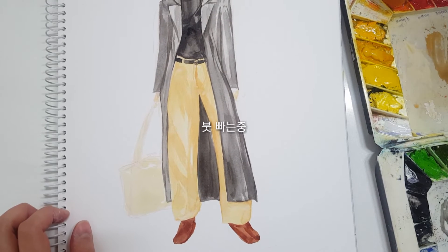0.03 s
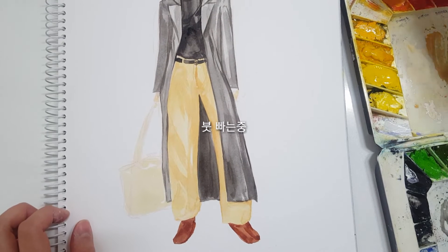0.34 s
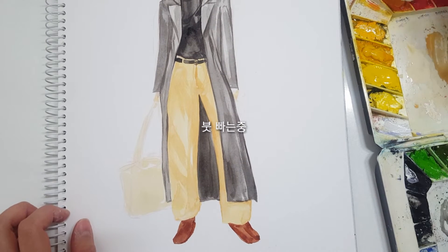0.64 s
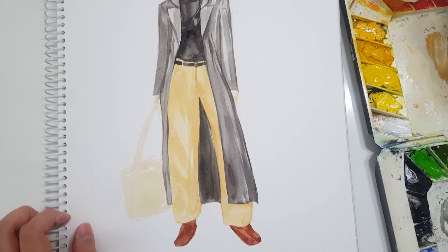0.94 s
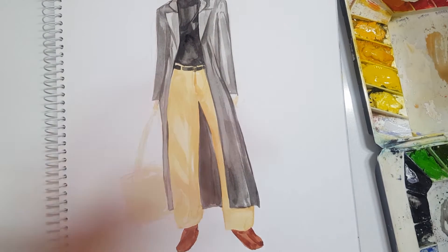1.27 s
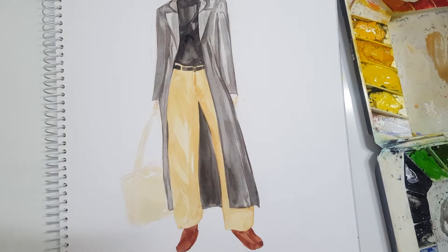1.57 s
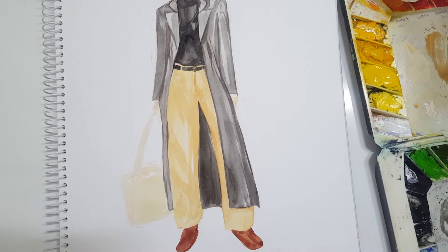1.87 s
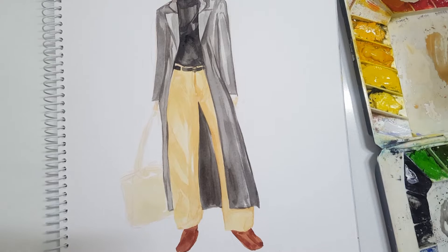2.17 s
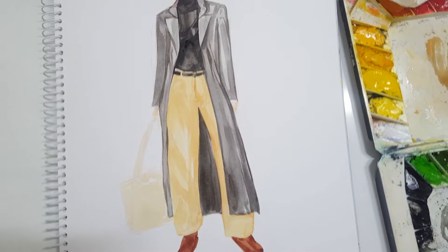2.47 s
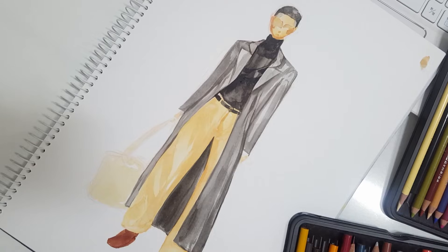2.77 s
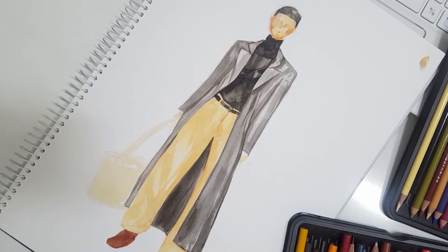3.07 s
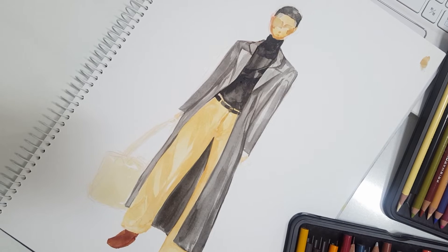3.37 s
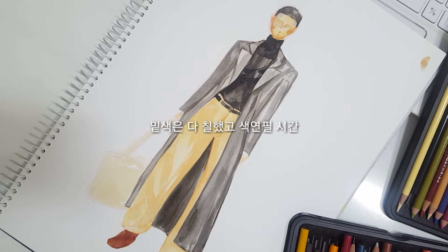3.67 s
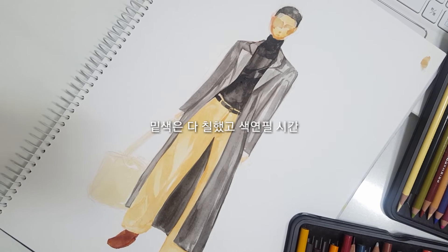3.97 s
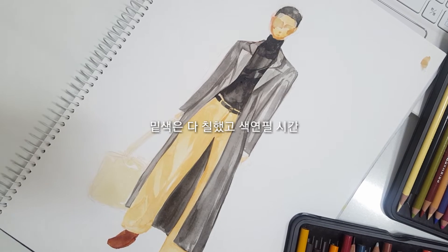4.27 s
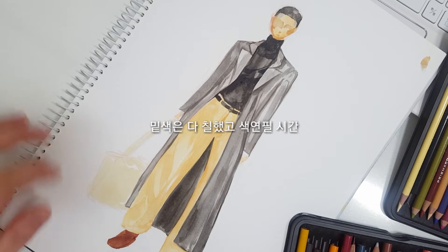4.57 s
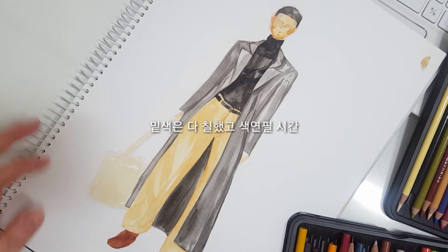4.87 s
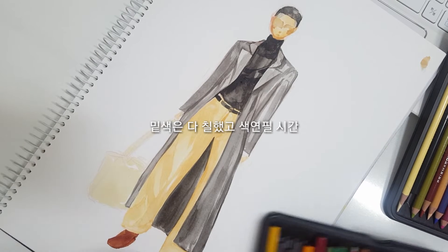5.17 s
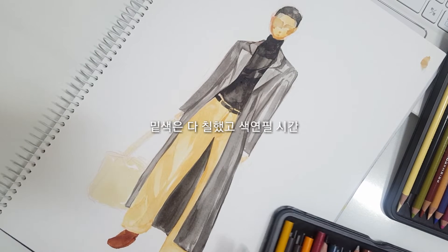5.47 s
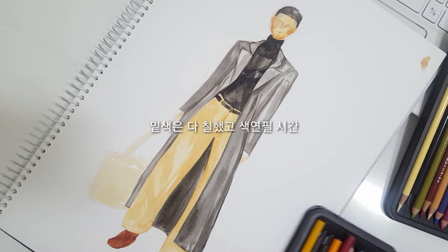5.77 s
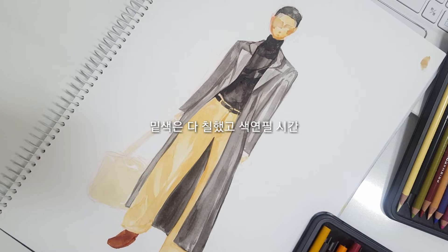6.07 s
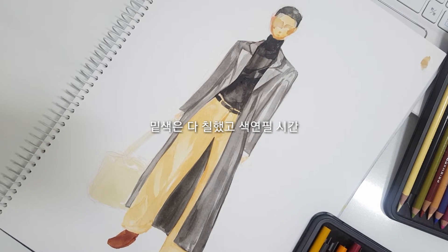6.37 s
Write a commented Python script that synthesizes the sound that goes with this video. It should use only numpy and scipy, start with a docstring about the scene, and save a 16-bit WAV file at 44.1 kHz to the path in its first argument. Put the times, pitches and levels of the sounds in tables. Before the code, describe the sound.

A hand bumps a desk and a brush clinks in a jar, then a tin of pencils scrapes and rattles across the desk.

```python
"""Painting things are handled on a desk in a small quiet room. First a hand brushes a sketchbook
(sliding friction) and bumps it (impacts that set the desk booming). Near 2 s a rinsed brush clinks
against its water jar, whose modes ring freely. A low wavering drone swells at 3.5 s. From 4.9 s a tin
of coloured pencils is pushed round in short shoves: stick-slip friction makes it grind, and jolts
make the pencils rattle. Just after 6 s it settles with two thuds."""
import sys
import numpy as np
from scipy import signal
from scipy.fft import rfft, irfft
from scipy.io import wavfile
from scipy.ndimage import uniform_filter1d

SR = 44100
rng = np.random.default_rng(int(sys.argv[2]) if len(sys.argv) > 2 else 0)


def wrap_up_sound(samples):
    """Save the sound to the file named by the first command line argument, as 16-bit audio."""
    columns = np.atleast_2d(samples).T
    # keep every value between -1 and 1, then stretch to whole-number steps
    tamed = np.clip(columns, -1, 1)
    steps = np.round(tamed * 32767).astype(np.int16)
    wavfile.write(sys.argv[1], SR, steps)


N = 282681
SIZE = 16384  # samples in one impulse response
HZ = np.maximum(np.arange(SIZE // 2 + 1) * SR / SIZE, 1)  # its frequency grid
AGE = np.arange(SIZE) / SR  # its time axis in seconds
DIRECT_WIDTH_DB = -3  # direct sound is narrower than the diffuse field

# Tabulated levels are relative: each source applies its own gain.
# jolts of the pencils in the tin: t/s, clack level/dB, sharpness/dB, desk knock level/dB, hollow f/Hz
JOLTS = [(4.926, -27, 0, -49.5, 1330), (5.086, -29.5, -1.5, -61, 1250), (5.156, -27.5, -15, -48, 1070),
         (5.164, -22, -1.5, -46, 1140), (5.179, -11.5, -1, -42, 1080), (5.202, -18, -3.5, -48, 1150),
         (5.248, -9, -5, -53, 934), (5.266, -21.5, -26, -72, 865), (5.353, -20.5, -6, -43, 875),
         (5.446, -21.5, 5, -37, 990), (5.479, -13, -0.5, -49, 1010), (5.489, -23, 14.5, -49, 1040),
         (5.499, -18, 5, -38.5, 1080), (5.549, -19, -13, -38, 1010), (5.592, -19.5, -7, -44, 1180),
         (5.603, -22, -8, -46, 1020), (5.646, -20, -7, -38.5, 1167), (5.695, -15.5, -17.5, -36.5, 800),
         (5.726, -15.5, 1, -39, 1100), (5.808, -13.5, 2.5, -28, 1090), (5.814, -22, 2.5, -32, 1020),
         (5.893, -21.5, -11, -43, 1260), (5.927, -30, -3, -51, 1220), (5.935, -24.5, -8, -47, 1280),
         (5.971, -18.5, -2.5, -43.5, 1260)]
# resonances of the tin's panels: f/Hz, bandwidth/Hz, lift/dB
TIN_MODES = [(213, 22, 8), (280, 16, 9), (425, 16, 5), (510, 10, 9), (645, 16, 4), (742, 20, 5),
             (932, 20, 8), (1030, 24, 10), (1130, 24, 8), (1260, 30, 3), (1435, 26, 6), (1558, 26, 5),
             (1724, 26, 6), (1959, 20, 7), (2046, 20, 7), (2223, 14, 9), (2445, 26, 7), (3201, 14, 8),
             (3285, 18, 8), (3580, 50, 3)]
# spectral envelopes of the tin's clack and of the snap and click at the contact: f/Hz, level/dB
CLACK_SPECTRUM = [(100, -45), (350, -9), (600, -7), (1000, -5.5), (1500, -2.5), (2200, -6), (3500, -29),
                  (5000, -27), (9000, -56)]
SNAP_SPECTRUM = [(1000, -27), (2000, 2.5), (2600, -1), (3800, -1.5), (4600, -8.5), (6000, -8.5),
                 (12000, -38)]
CLICK_SPECTRUM = [(2000, -7), (4500, 4), (5500, 7.5), (8000, 6), (10500, 6), (11900, 3), (13000, 0),
                  (15500, -8)]


def tin_rattle(clack_db, snap_db, click_db, knock_db, clank_db, rise_s):
    """Impact excitation: each jolt sounds tin and desk; a sharper contact radiates more treble."""
    out = np.zeros((2, N))
    board = spectrum(DESK_SPECTRUM, DESK_MODES)
    for s, db, sharpness, desk_db, hollow_hz in JOLTS:
        decay_s = 0.0057 * np.exp(0.083 * rng.standard_normal())
        # the point of contact favours some panels; every pencil has brief modes of its own
        panels = [(hz, width, lift + rng.standard_normal()) for hz, width, lift in TIN_MODES]
        pencil = [(hz, 31, 9) for hz in rng.uniform(2497, 14000, size=12)]
        clack = spectrum(CLACK_SPECTRUM, panels) + 15 * bell(hollow_hz, width_hz=490)
        contact = spectrum(SNAP_SPECTRUM, pencil)
        snap = contact + 5.5 * bell(2000 + 20 * sharpness, width_hz=320)
        click = spectrum(CLICK_SPECTRUM, pencil)
        clank = contact + 13 * bell(3800, width_hz=700)  # the base lands on the desk
        add(out, s, from_db(db + clack_db) * impact(clack, decay_s, rise_s))
        add(out, s, from_db(db + sharpness + snap_db) * impact(snap, decay_s, rise_s))
        add(out, s, from_db(db + 1.13 * sharpness + click_db) * impact(click, 0.67 * decay_s))
        add(out, s, from_db(desk_db + knock_db) * impact(board, decay_s=0.0021))
        add(out, s, from_db(desk_db + clank_db) * impact(clank, decay_s))
    return out


# shoves of the tin: t/s, duration/s, level/dB, swell/dB, grit level re the shove/dB
TIN_SHOVES = [(4.923, 0.11, -46, -3.5, -5.5), (5.062, .075, -43, 2, -12), (5.158, 0.11, -36.5, 1, -17),
              (5.351, 0.18, -31.5, 2, -15.5), (5.432, 0.062, -26, -0.5, -9), (5.64, 0.12, -41, -1.5, -10),
              (5.818, 0.14, -45, 3.5, -7.5)]
# spectral envelopes of the grinding tin and of its gritty hiss: f/Hz, level/dB
GRIND_SPECTRUM = [(60, -29), (200, -5.5), (400, 2), (600, 2), (800, 7.5), (1050, 4), (1500, 5.5),
                  (2200, -1.5), (3000, -7.5), (3800, -24), (5000, -28), (9000, -67)]
GRIT_SPECTRUM = [(1000, -34), (2500, 8.5), (4000, 7), (5500, 2), (8000, -2), (10500, -2.5), (11900, -2.5),
                 (13000, -2.5), (15500, -18)]


def tin_slide(grind_db, hiss_db, patter_db):
    """Forced vibration: the tin's juddering base drives its panels, a hiss and the loose pencils."""
    drive, grit = 0, 0
    for s, length_s, db, swell_db, grit_db in TIN_SHOVES:
        shove = from_db(db) * gesture(s, length_s, attack_s=0.0052, fall_db_per_s=174, swell_db=swell_db)
        drive = np.maximum(drive, shove)
        grit = np.maximum(grit, from_db(grit_db) * shove)
    slips = friction(slips_per_s=400, spread_db=0.5, slip_s=0.005, smooth_share=0.15)
    panels = spectrum(GRIND_SPECTRUM, TIN_MODES) + 1.5 * bell(1080, width_hz=240)  # the hollow sings too
    grind = from_db(grind_db) * colour(drive * slips, panels) / np.std(colour(slips, panels))
    hiss = from_db(hiss_db) * unit_rms(colour(slips, spectrum(GRIT_SPECTRUM)))
    patter = from_db(patter_db) * pencil_patter(spectrum(GRIT_SPECTRUM, TIN_MODES))
    return grind + grit * (hiss + patter)


def pencil_patter(gain_db, pencils=5, taps_per_s=110, spread_db=4):
    """Poisson process: loose pencils collide at random, each ringing briefly in its own modes."""
    out = 0
    for _ in range(pencils):
        strength = from_db(spread_db * np.minimum(rng.exponential(1, N), 2.5))
        taps = strength * (rng.random(N) < taps_per_s / pencils / SR)
        modes = [(hz, 110, 13) for hz in rng.uniform(1770, 12070, size=6)]
        response = impact(gain_db + resonances(modes), decay_s=0.0019)
        out = out + signal.fftconvolve(taps[None], response, axes=1)[:, :N]
    return unit_rms(out)


# soft blows on the desk: t/s, level/dB, thump re the blow/dB, rap re the blow/dB, boom f/Hz
DESK_BLOWS = [(0.45, -48, -8, -6.5, 282), (0.468, -45.5, 2.5, -18, 102), (0.517, -53, 7.5, -5, 102),
              (0.683, -27, -20, -9, 377), (0.696, -32, -18, -20, 396), (0.845, -49, 4.5, -10, 151),
              (1.081, -46, 2.5, -19, 136), (1.283, -47.5, -3, -5.5, 210), (1.378, -58, 4, 4, 201),
              (1.552, -46, -2, -18, 173), (6.043, -32, -3, -6, 190), (6.084, -29.5, -3.5, -8, 170),
              (6.1, -34, -6, -35, 170), (6.337, -45.5, 2, -22, 164), (6.38, -51.5, 7, -4.5, 145)]
# resonances of the desk top: f/Hz, bandwidth/Hz, lift/dB
DESK_MODES = [(96, 16, 4), (158, 16, 5), (210, 15, 10), (280, 10, 13), (323, 12, 7), (388, 14, 5),
              (592, 15, 9), (830, 30, 4)]
# spectral envelopes of the desk's knock, deep thump and hard rap: f/Hz, level/dB
DESK_SPECTRUM = [(40, -18), (110, -4.5), (170, -3), (220, 1.5), (330, -9.5), (450, -8.5), (700, -11.5),
                 (1500, -23.5), (4000, -30), (15000, -105)]
THUMP_SPECTRUM = [(20, -42), (55, -2), (100, 4.5), (150, 8), (260, -27.5), (1000, -67), (15000, -100)]
RAP_SPECTRUM = [(150, -10), (400, -1.5), (620, -3.5), (850, 6), (1200, -30.5), (1700, -20), (3000, -39),
                (15000, -36)]


def desk_bumps(knock_db, thump_db, rap_db):
    """Plate vibration: hand, tin and jar set the desk booming; a harder blow has a shorter contact."""
    out = np.zeros((2, N))
    cushion = -10 * np.log10(1 + (HZ / 2040) ** 4)  # a soft contact is a low-pass filter
    board = spectrum(DESK_SPECTRUM, DESK_MODES) + cushion
    deep = spectrum(THUMP_SPECTRUM, DESK_MODES)
    hard = spectrum(RAP_SPECTRUM) + 0.12 * resonances(DESK_MODES) + cushion
    under_jar = [(s, db, -8, -14, 228) for s, *_, db in JAR_STRIKES]  # columns as in DESK_BLOWS
    for s, db, thump, rap, boom_hz in DESK_BLOWS + under_jar:
        push_s = 0.0017 * 2 ** ((-44.5 - db) / 38)  # halves for a blow 38 dB harder
        rap_s = 0.51 * push_s
        boom = board + 4 * bell(boom_hz, width_hz=230)  # its pitch depends on the spot struck
        add(out, s, from_db(db + knock_db) * impact(boom, push_s, push_s))
        add(out, s, from_db(db + thump + thump_db) * impact(deep, push_s, push_s))
        add(out, s, from_db(db + rap + rap_db) * impact(hard, rap_s, rap_s))
    return out


# strikes of the brush on the jar: t/s, place, ring level/dB, crack level/dB,
# crack tilt/(dB per octave), share of the free decay time, desk knock level/dB
JAR_STRIKES = [(0.0, "foot", -58, -63.5, 0.5, 0.96, -49), (1.653, "rim", -47, -52.5, 3.5, 0.28, -44.5),
               (1.811, "foot", -46, -53.5, -1, 0.46, -37), (2.089, "wall", -42, -50, 1, 0.36, -45)]
# modes of the jar: f/Hz, free T60/s, level/dB when struck at the rim, at the wall, at the foot
JAR_MODES = [(1300, 0.31, -37, -10, -24), (1264, 0.18, -23, -4.5, -11), (1470, 0.09, -3, -37, 3),
             (2065, 0.31, -2, -5, -8), (2175, 0.18, -15, 0.5, 2), (2140, 0.11, -4.5, -11, -3),
             (3219, 0.83, -30, -7, -37), (3276, 0.28, -1.5, -4.5, -27), (3730, 0.064, -12, -10, -33),
             (4200, 0.03, -15, -18, 1), (4350, 0.071, 5, 6, -1.5), (4640, 0.091, 4, -5, -6.5),
             (5000, 0.11, -12, -26, -23), (5080, 0.14, 0, -0.5, -24), (6770, 0.061, 0.5, -28, -23),
             (9030, 0.32, -35, -20, -36), (9200, 0.21, -26, -13, -33), (10860, 0.13, -2, -45, -22),
             (12500, 0.16, -19, -33, -20), (11600, 0.19, -10, -31, -30)]
# places struck, in the order of those level columns
JAR_PLACES = ["rim", "wall", "foot"]
# spectral envelope of the handle's crack: f/Hz, level/dB
CRACK_SPECTRUM = [(200, -79), (700, 21.5), (1400, -4), (2500, 9.5), (4300, 11), (7000, -4), (9000, -4.5),
                  (12000, 5.5), (15500, -19)]


def jar_clinks(crack_s, scatter_db, flutter_hz, flutter_depth):
    """Damped free vibration: the brush handle strikes the jar; the place struck weights the modes."""
    out = np.zeros((2, N))
    hz, t60, *levels = np.transpose(JAR_MODES)[:, :, None]
    count = len(JAR_MODES)
    flutter_filter = signal.butter(2, flutter_hz, fs=SR, output="sos")
    for s, place, ring_db, crack_db, tilt, decay_share, _ in JAR_STRIKES:
        mode_db = levels[JAR_PLACES.index(place)] + 0.6 * min(tilt, 0) * np.log2(hz)
        strength = from_db(mode_db + scatter_db * rng.standard_normal((2, count, 1)))
        # each mode's level wavers at random, roughening the jar's ring
        flutter = unit_rms(signal.sosfilt(flutter_filter, rng.standard_normal((count, SIZE))))
        phase = 2 * np.pi * (hz * AGE + rng.random((count, 1)))
        phase = phase + rng.standard_normal((2, count, 1))  # left and right are a little out of step
        decay = from_db(-60 * AGE / (t60 * decay_share))
        ring = (strength * (1 + flutter_depth * flutter) * np.sin(phase) * decay).sum(axis=1)
        add(out, s, from_db(ring_db) * unit_onset(ring))
        crack = spectrum(CRACK_SPECTRUM) + tilt * np.log2(HZ)
        for delay_s, loss_db in [(0, 0), (0.0038, -7.5)]:  # strike and rebound
            add(out, s + delay_s, from_db(crack_db + loss_db) * impact(crack, crack_s))
    return out


# strokes over the sketchbook: t/s, duration/s, rustle level/dB, scuff level/dB, rumble level/dB
HAND_STROKES = [(0, 0.25, -73.5, -71.5, -66.5), (0.428, 0.31, -71.5, -74, -56.5),
                (0.864, 0.043, -65, -80, -63), (1.003, 0.099, -70, -73, -50.5),
                (1.134, 0.09, -71.5, -61, -54.5), (1.23, 0.37, -73, -78, -65), (1.84, 0.4, -78, -89, -71.5),
                (4.288, 0.14, -73.5, -84, -67), (4.452, 0.24, -82, -94, -79),
                (6.048, 0.092, -66, -52.5, -47), (6.156, 0.07, -48.5, -54, -54),
                (6.243, 0.19, -73.5, -63, -53.5)]
# spectral envelope of rubbed paper: f/Hz, level/dB
PAPER_SPECTRUM = [(150, 5), (500, 2.5), (1300, 2.5), (3000, -3), (5000, -8), (8000, -10.5), (12000, -9.5),
                  (15500, -15.5)]


def hand_on_paper(rustle_db, scuff_db, rumble_db):
    """Sliding friction: skin rustles and scuffs over the page, and its drag rumbles in the desk."""
    envelopes = 0
    for s, length_s, *levels in HAND_STROKES:
        stroke = gesture(s, length_s, attack_s=0.063 * length_s, fall_db_per_s=49 / length_s)
        envelopes = envelopes + from_db(levels)[:, None] * stroke
    rustle, scuff, rumble = envelopes
    rub = friction(slips_per_s=1200, spread_db=0.5, slip_s=0.002, smooth_share=0.33)
    drag = friction(slips_per_s=55, spread_db=-2.5, slip_s=0.02, smooth_share=0.3)
    page = spectrum(PAPER_SPECTRUM)
    pressed_skin = page + 14 * bell(1390, width_hz=3800)
    board = spectrum(DESK_SPECTRUM, DESK_MODES) + 8 * bell(165, width_hz=200)
    return (from_db(rustle_db) * rustle * unit_rms(colour(rub, page))
            + from_db(scuff_db) * scuff * unit_rms(colour(drag, pressed_skin))
            + from_db(rumble_db) * rumble * unit_rms(colour(drag, board)))


# small dry ticks: t/s, level/dB
PAPER_TICKS = [(0.215, -59), (0.628, -50.5), (0.6798, -47.5), (1.0145, -50), (1.0934, -51.5), (2.493, -58),
               (6.079, -50), (6.2201, -34.5), (6.2939, -50.5)]


def paper_ticks(gain_db):
    """Impulsive excitation: a very brief contact sounds the paper's broad spectrum."""
    out = np.zeros((2, N))
    for s, db in PAPER_TICKS:
        add(out, s, from_db(db + gain_db) * impact(spectrum(PAPER_SPECTRUM), decay_s=0.0022))
    return out


# squeaks of things rubbing: t/s, duration/s, f/Hz, bandwidth/Hz, level/dB
RUB_SQUEAKS = [(1.933, .13, 848, 80, -66), (2.16, 0.069, 820, 80, -66), (5.003, .024, 5600, 750, -44)]


def squeaks():
    """Narrow-band resonance: a rubbing contact sings briefly around one frequency."""
    out = np.zeros((2, N))
    for s, length_s, hz, width_hz, db in RUB_SQUEAKS:
        swell = signal.windows.tukey(int(length_s * SR))
        band = colour(white_noise(SIZE), 20 * np.log10(bell(hz, width_hz) + 1e-4))
        add(out, s, from_db(db) * unit_rms(band[:, -len(swell):]) * swell)
    return out


# reverberation time of the room: f/Hz, T60/s
REVERB_TIMES = [(150, 0.45), (1000, 0.22), (4000, 0.25), (14000, 0.18)]


def room(x, wet_db):
    """Reverberation: a diffuse tail decays exponentially in each octave, slowest in the bass."""
    white = rfft(white_noise(SIZE))
    octave = np.floor(np.log2(np.maximum(HZ, 128)))
    tail = 0
    for k in np.unique(octave):
        t60 = spectrum(REVERB_TIMES)[octave == k].mean()
        tail = tail + irfft(white * (octave == k)) * from_db(-60 * AGE / t60)
    onset = np.clip(AGE / 0.0034 - 1, 0, 1)  # reflections begin after 3.4 ms
    tail = unit_rms(tail * onset) / np.sqrt(SIZE)
    return x + from_db(wet_db) * signal.fftconvolve(x, tail, axes=1)[:, :N]


# spectral envelopes of the room air and of the low drone: f/Hz, level/dB
AIR_SPECTRUM = [(15, -63), (25, -54.5), (48, 4), (82, 1.5), (110, 0.5), (136, -5.5), (173, -2), (274, -6),
                (297, -11), (421, -7), (684, -11.5), (1300, -12), (2230, -20.5), (8130, -31.5),
                (15500, -29)]
DRONE_SPECTRUM = [(40, -41), (80, -21.5), (105, 3), (120, -4.5), (145, -17), (200, -14.5), (300, -25.5),
                  (600, -61.5)]
# a faint steady whine: f/Hz, bandwidth/Hz, lift above the air/dB
WHINE_PEAK = [(10840, 43, 10)]
# course of the drone: t/s, level/dB
DRONE_ENVELOPE = [(0, -70), (3.1, -79), (3.55, -62.5), (4.2, -62), (4.9, -61.5), (6.41, -61)]


def background(air_db):
    """Filtered noise: broadband room air with a faint whine, and a low drone whose narrow band wavers."""
    air = unit_rms(colour(white_noise(N), spectrum(AIR_SPECTRUM, WHINE_PEAK)))
    drone = unit_rms(colour(white_noise(N), spectrum(DRONE_SPECTRUM)))
    drone_db = np.interp(np.arange(N) / SR, *np.transpose(DRONE_ENVELOPE))
    return from_db(air_db) * air + from_db(drone_db) * drone


def chatter(decay_s, rise_s):
    """Contact force: a burst of micro-impacts builds and dies away, whitened to be even across pitch."""
    burst = rng.standard_normal(SIZE) * np.exp(-AGE / decay_s) * (1 - np.exp(-AGE / rise_s)) ** 2
    power = uniform_filter1d(abs(rfft(burst)) ** 2, size=60)
    return colour(burst, -10 * np.log10(power + 1e-12))[0]


def impact(gain_db, decay_s, rise_s=0.0001):
    """Source and filter: a contact force is heard through a body's frequency response."""
    force = stereo(chatter(decay_s, rise_s), chatter(decay_s, rise_s), DIRECT_WIDTH_DB)
    return unit_onset(colour(force, gain_db))


def friction(slips_per_s, spread_db, slip_s, smooth_share):
    """Stick-slip motion: uneven little bursts of noise over a smooth rub."""
    slips = rng.random(N) < slips_per_s / SR
    energy = from_db(spread_db * np.minimum(rng.exponential(1, N), 3)) ** 2
    power = signal.lfilter([1], [1, -np.exp(-2 / (slip_s * SR))], slips * energy + 1e-18)
    return white_noise(N, DIRECT_WIDTH_DB) * np.sqrt(power / power.mean() + smooth_share)


def gesture(start_s, length_s, attack_s, fall_db_per_s, swell_db=0):
    """Amplitude envelope of a hand movement: attack, a hold that may swell, exponential release."""
    age = np.arange(N) / SR - start_s
    db = swell_db * np.clip(age / length_s, 0, 1) - fall_db_per_s * np.maximum(age - length_s, 0)
    return np.clip(age / attack_s, 0, 1) * from_db(np.maximum(db, -150))


def bell(hz, width_hz):
    """Lorentzian resonance curve of height 1."""
    return 1 / (1 + (2 * (HZ - hz) / width_hz) ** 2)


def resonances(modes):
    """Power summation: the joint lift of resonance peaks, in dB."""
    lift = sum((from_db(db) ** 2 - 1) * bell(hz, width) for hz, width, db in modes)
    return 10 * np.log10(np.maximum(1 + lift, 1e-3))


def spectrum(points, modes=()):
    """Interpolation over log frequency, with any resonances raised above the curve."""
    hz, value = np.transpose(points)
    return np.interp(np.log(HZ), np.log(hz), value) + resonances(modes)


def colour(x, gain_db):
    """Causality: in a minimum-phase filter resonances ring on after the blow, and nothing sounds early."""
    cepstrum = irfft(np.log(from_db(gain_db)))
    cepstrum[1:SIZE // 2] *= 2
    cepstrum[SIZE // 2 + 1:] = 0
    response = irfft(np.exp(rfft(cepstrum)))
    return signal.fftconvolve(np.atleast_2d(x), response[None], axes=1)[:, :x.shape[-1]]


# stereo width: f/Hz, side level re mid/dB
SIDE_SPECTRUM = [(30, -5), (120, -15), (280, -9.5), (600, -4.5), (1200, -1), (2200, 3), (4000, 2),
                 (12000, 2)]


def stereo(mid, side, width_db=0):
    """Spatial coherence: bass reaches left and right alike, treble differently."""
    return mid + colour(side, spectrum(SIDE_SPECTRUM) + width_db) * [[1], [-1]]


def white_noise(samples, width_db=0):
    """Gaussian noise, white in the mid signal and spread in stereo."""
    return stereo(*rng.standard_normal((2, samples)), width_db)


def to_left(x, balance, lag_samples):
    """Level and time differences: a source on the left is louder and earlier on that side."""
    n = np.arange(N)
    lean_db = spectrum(balance) / 2
    late_right = np.interp(n - lag_samples, n, x[1])
    return np.vstack([colour(x[0], lean_db), colour(late_right, -lean_db)])


def from_db(db):
    """Level to amplitude ratio."""
    return 10 ** (np.asarray(db) / 20)


def unit_rms(x):
    """Normalisation to unit rms."""
    return x / np.sqrt(np.mean(x ** 2) + 1e-20)


def unit_onset(x):
    """Normalisation to unit rms over the first 20 ms."""
    return x / np.sqrt(np.mean(x[..., :SR // 50] ** 2))


def add(out, s, sound):
    """Superposition of a sound at time s."""
    start = max(round(s * SR), 0)
    out[:, start:start + sound.shape[-1]] += sound[..., :N - start]


# leftward lean of the tin and of the desk: f/Hz, left level re right/dB
TIN_LEAN = [(350, 1), (700, 3), (1300, 2), (4400, 0), (15000, 0)]
DESK_LEAN = [(100, 0.1), (1000, 2)]


def scene():
    """Superposition of every source and its reverberation, heard from just above the desk."""
    rattle = tin_rattle(clack_db=-14, snap_db=-19.5, click_db=-27, knock_db=-6, clank_db=-6,
                        rise_s=0.00052)
    slide = tin_slide(grind_db=-1, hiss_db=2, patter_db=-1)
    tin = to_left(room(slide + rattle, wet_db=-13), TIN_LEAN, lag_samples=5.19)
    bumps = desk_bumps(knock_db=-7.5, thump_db=-8, rap_db=-8.5)
    desk = to_left(room(bumps, wet_db=-11.5), DESK_LEAN, lag_samples=6.8)
    jar = room(jar_clinks(crack_s=0.0015, scatter_db=4.5, flutter_hz=90, flutter_depth=0.35), wet_db=-5)
    strokes = hand_on_paper(rustle_db=2, scuff_db=-4.5, rumble_db=-3.5)
    hand = room(strokes + paper_ticks(gain_db=-13) + squeaks(), wet_db=-10.5)
    return tin + desk + jar + hand + background(air_db=-66)


def record(dry):
    """Band limiting: an elliptic low-pass filter cuts steeply above 15.8 kHz."""
    return signal.sosfilt(signal.ellip(10, 0.2, 80, 15800, fs=SR, output="sos"), dry)


dry = scene()
out = record(dry)
wrap_up_sound(out)
```